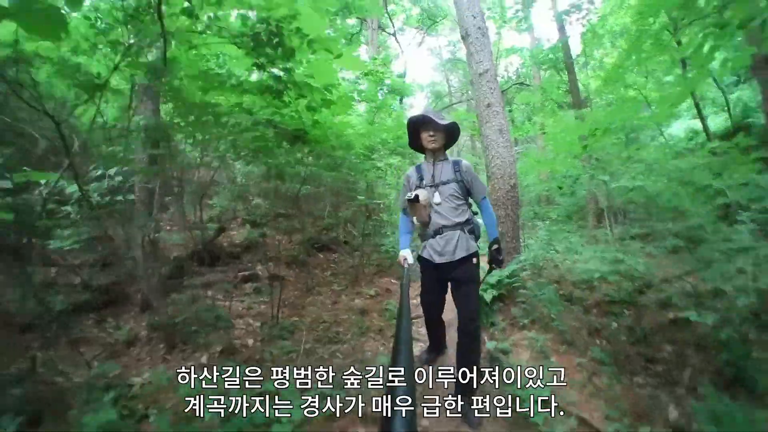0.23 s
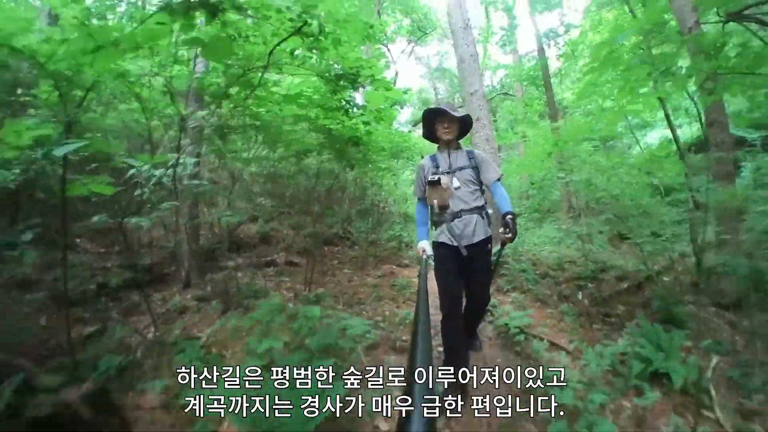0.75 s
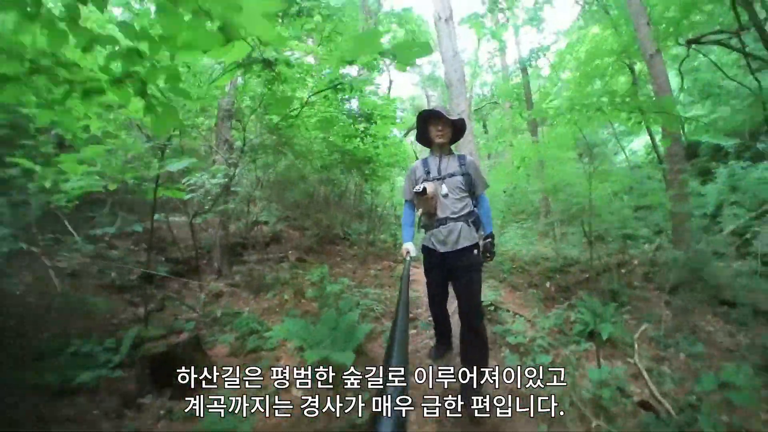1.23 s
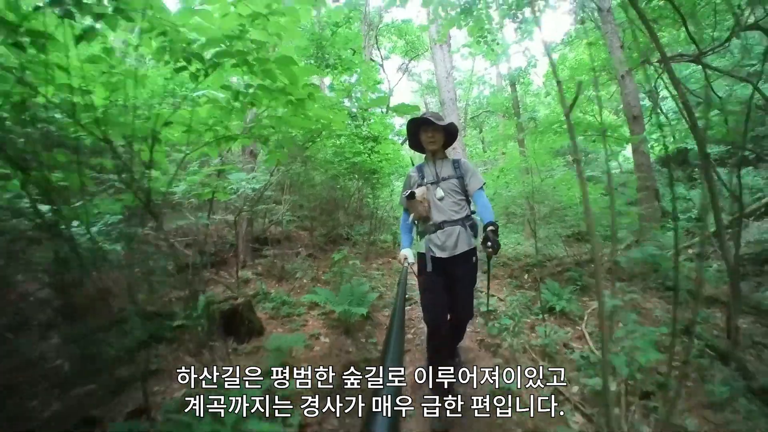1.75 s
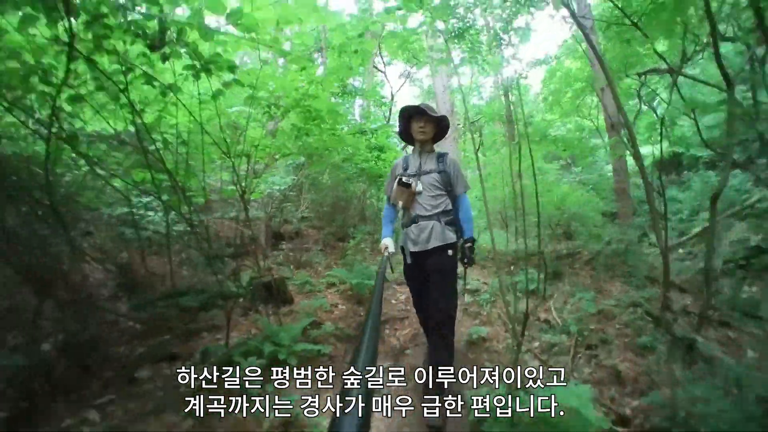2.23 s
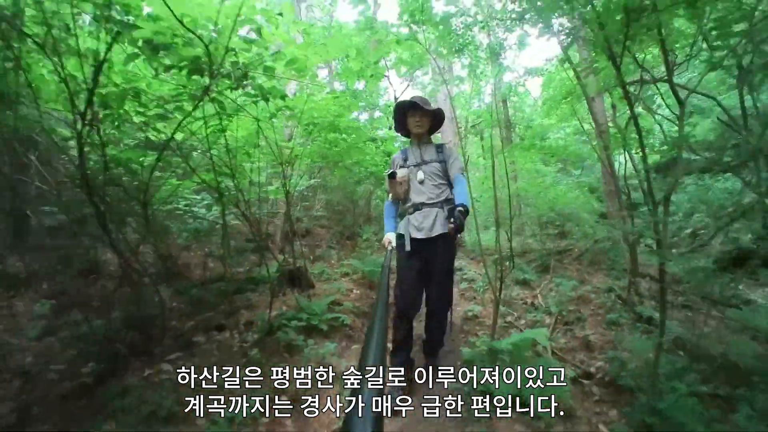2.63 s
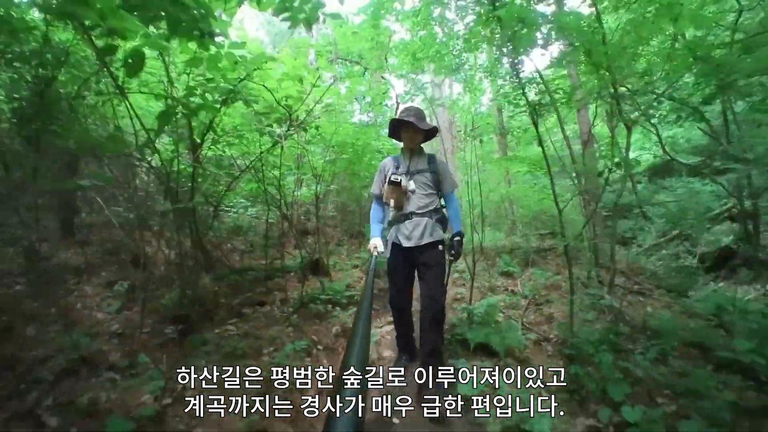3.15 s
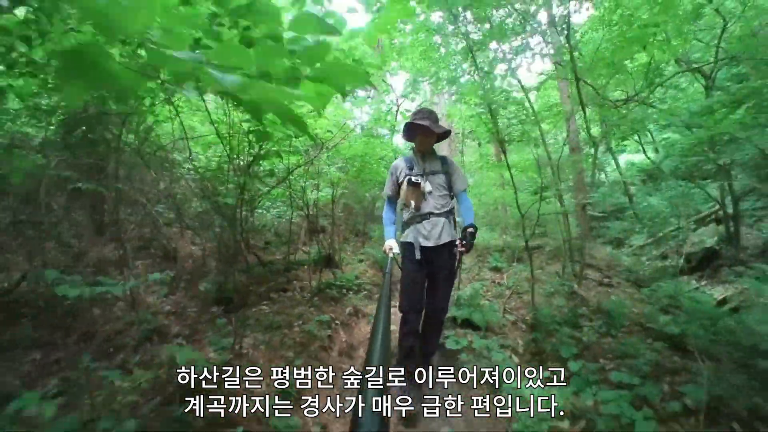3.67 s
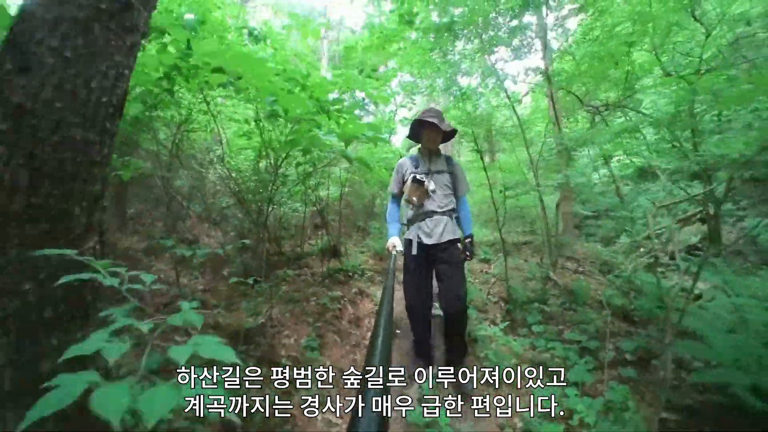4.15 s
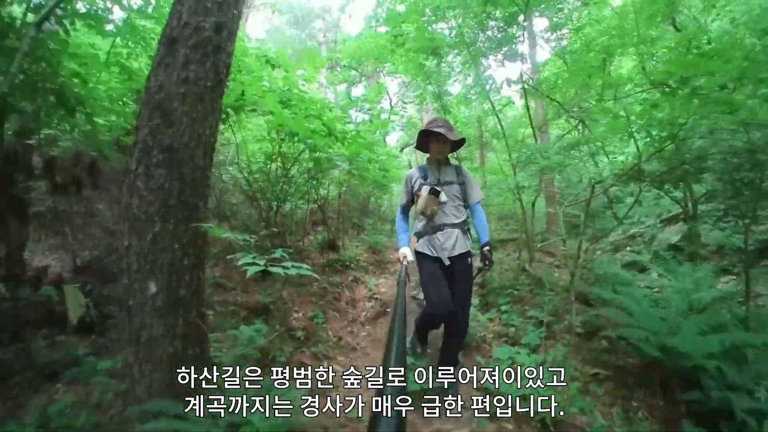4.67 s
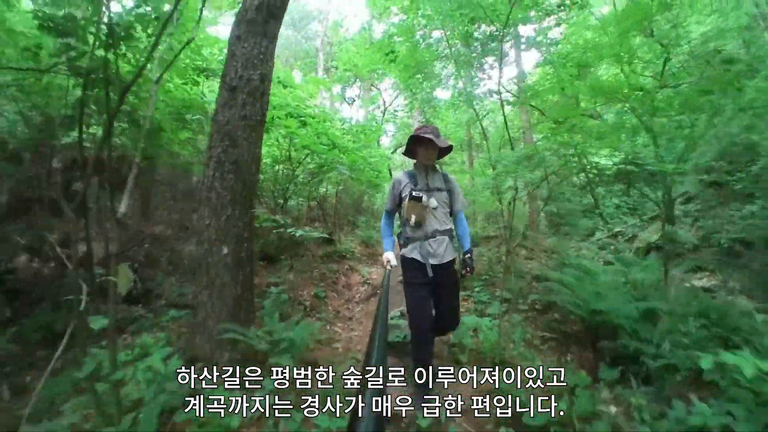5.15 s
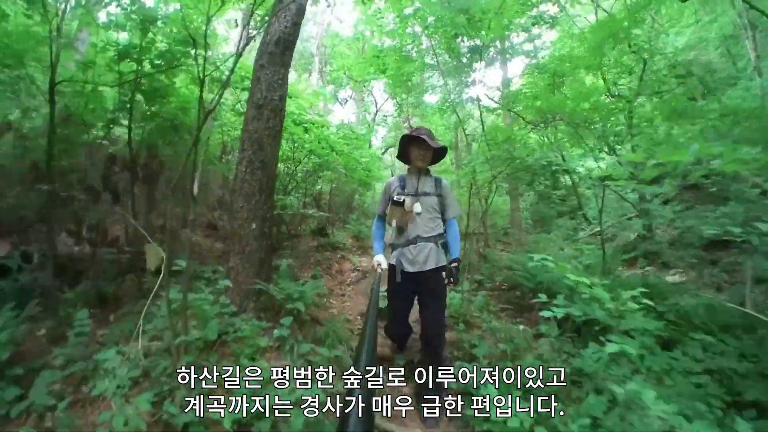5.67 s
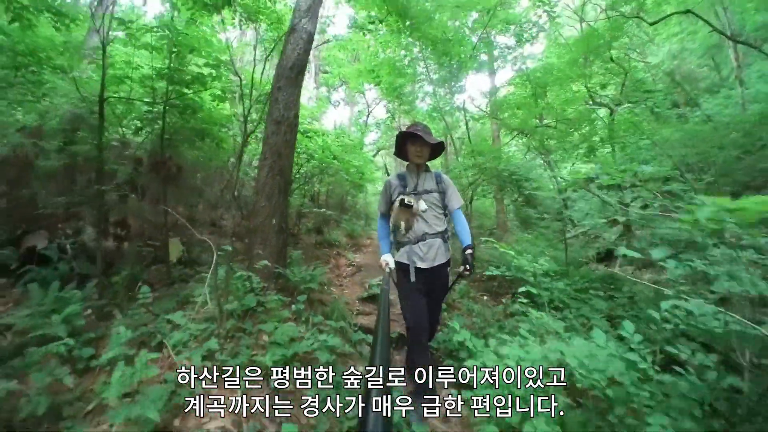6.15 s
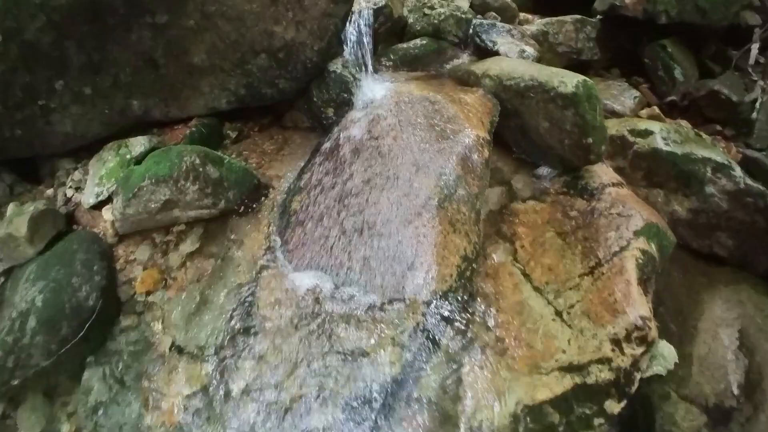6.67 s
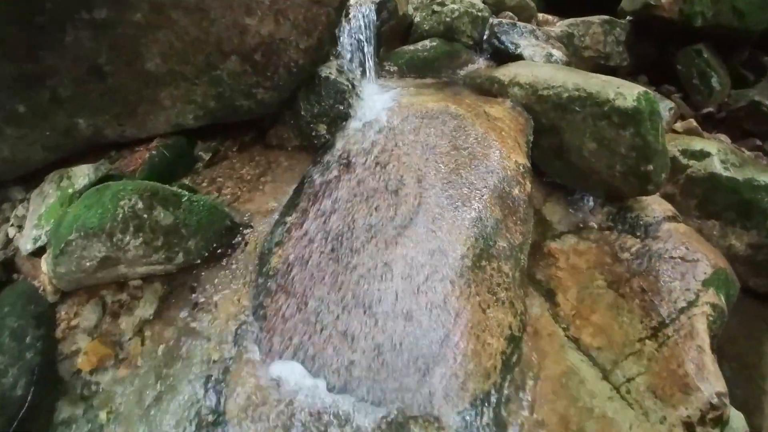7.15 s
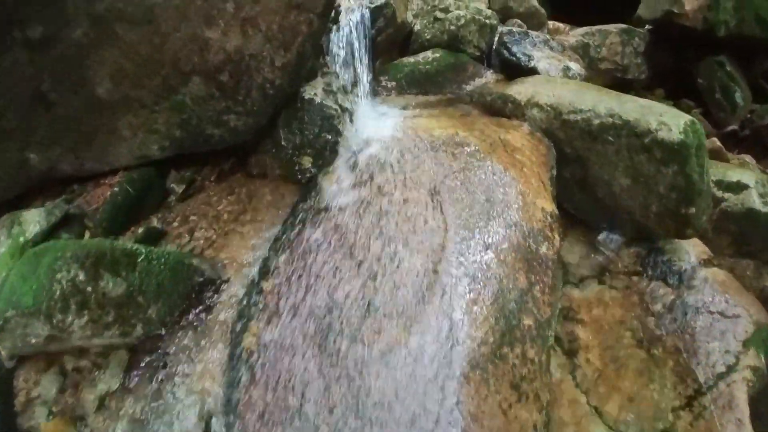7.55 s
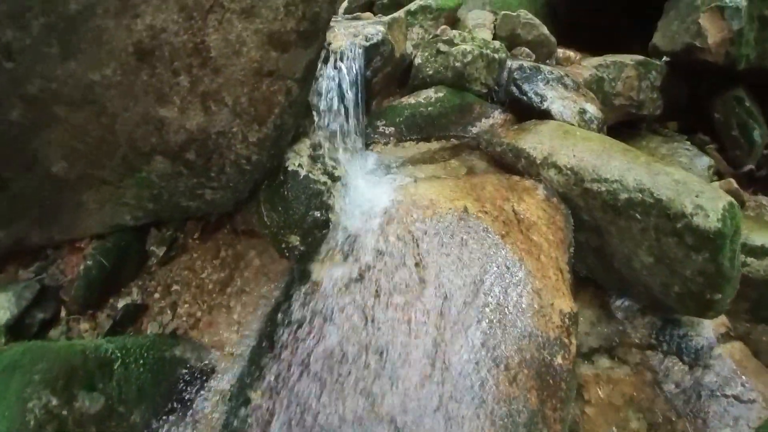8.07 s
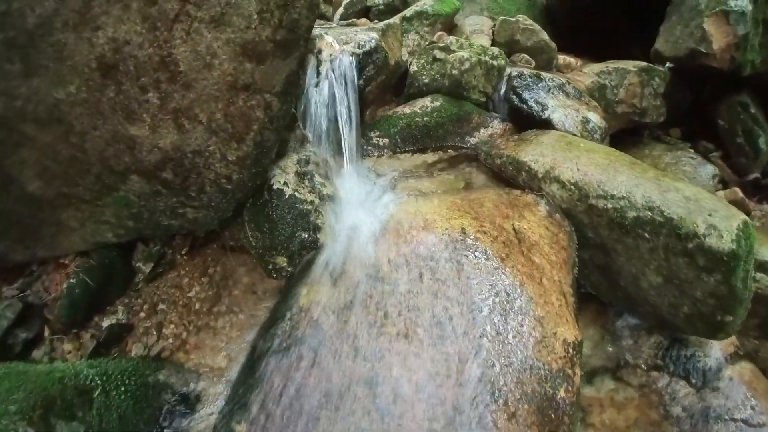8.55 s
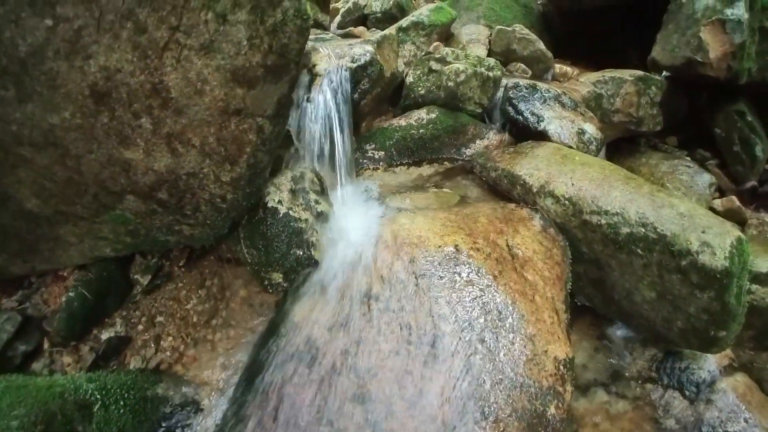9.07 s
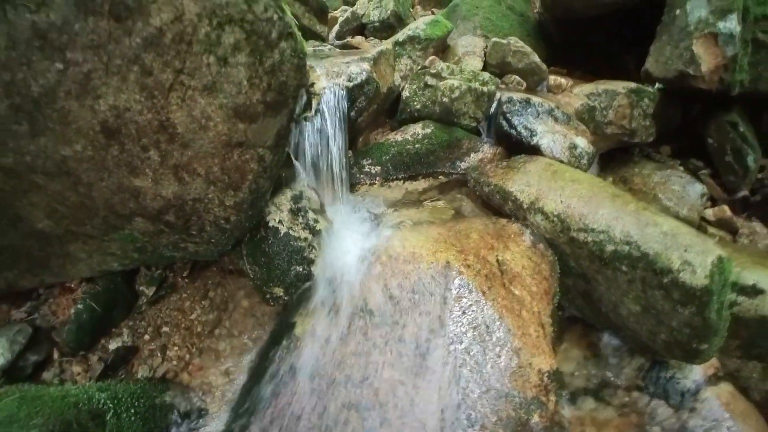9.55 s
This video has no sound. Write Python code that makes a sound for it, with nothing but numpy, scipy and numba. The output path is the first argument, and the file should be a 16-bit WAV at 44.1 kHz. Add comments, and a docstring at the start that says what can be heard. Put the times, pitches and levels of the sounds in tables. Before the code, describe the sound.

Irregular knocks and dull thumps from a hand-held pole dominate the first part, close and dry, with boots scraping leaf litter and twigs cracking. Far birds chirp, buzz and whistle around in the trees over very soft air. The walking then stops abruptly, replaced by a near trickling cascade: dense watery burble, crisp splatter on stone and occasional deeper gulps, continuing to the end as a rasping bird trills behind.

```python
"""A forest path: a hiker walks with a camera on a pole, then a small waterfall pours onto a rock slab close by.
Far off, songbirds (gliding, buzzing tones) and two early hoarse calls (pulsed resonances) echo in the trees.
Close to the microphone the pole knocks and thumps (damped pings); boots scuff dry leaves and snap twigs (shaped
grit and short rings), and clothes rub (fitful noise). The scene then changes all at once to the waterfall:
swarms of ringing bubbles, gulps, spray and single drops over coloured noise."""
import sys
import numpy as np
from scipy import signal
from scipy.fft import rfft, irfft
from scipy.io import wavfile
from scipy.ndimage import uniform_filter1d
from numba import njit

SR = 44100
rng = np.random.default_rng(int(sys.argv[2]) if len(sys.argv) > 2 else 0)


def dump_mix(stems):
    """Bounce the given channels to the path in sys.argv[1] as a 16-bit WAV at rate SR."""
    frames = np.atleast_2d(stems).T  # one column per channel
    limited = np.clip(frames, -1, 1)  # hard clip at full scale
    pcm = np.round(limited * 32767).astype(np.int16)
    wavfile.write(sys.argv[1], SR, pcm)


N = 432621
TIME = np.arange(N) / SR

# Air in the canopy, all around. Each row: frequency in Hz, level in dB.
CANOPY_COLOUR = [(30, -24.5), (55, -5.5), (90, -2.5), (200, 2.5), (400, 0), (800, 0.5), (1700, -5.5),
                 (4000, -8.5), (7500, -11.5), (15500, -11.5)]
# Width of that air. Each row: frequency in Hz, side level relative to mid in dB.
CANOPY_WIDTH = [(40, -12.5), (200, -3.5), (1000, -8.5), (4000, -6), (8000, -14.5), (15000, -6)]
CANOPY_DB = -63.5
# What the trunks throw back; long waves bend round them. Each row: frequency in Hz, level in dB.
TRUNK_SCATTER = [(40, -28), (200, -0.5), (600, -2.5)]

# Hoarse calls far off. Each row: start in seconds, length in seconds, level in dB before the echo.
FAR_CALLS = [(0.5, .68, -63), (1.78, .66, -63.5)]
# Throat resonances. Each row: frequency in Hz with the mouth wide open, level in dB.
THROAT_MODES = [(1566.5, 0.5), (1234, -6.5)]

# Pure whistles among the trees. Each row: start in seconds, number of notes, note length in seconds,
# starting pitch in Hz, held pitch in Hz, level in dB before the echo.
BIRD_WHISTLES = [(0.576, 1, 0.171, 4459, 4315, -59), (2.494, 1, 0.263, 4313, 4359, -62),
                 (3.459, 1, 0.118, 6240, 5624, -69), (3.468, 1, 0.225, 3324, 4150, -68),
                 (5.284, 1, 0.167, 4970, 4923, -66.5), (5.744, 1, 0.1556, 6642, 6502, -59.5),
                 (5.937, 3, .17, 8036, 7755, -70.5), (6.455, 1, 0.216, 3726, 3634, -63.5),
                 (6.576, 1, 0.13, 5613, 5367, -57.5)]
WHISTLE_GAP_S, WHISTLE_SETTLE = 0.05, 0.45  # rest between notes; glide time as a share of a note
# Slurs that swoop down to a held note. Each row: start in seconds, number of notes,
# seconds from note to note, held pitch in Hz, level in dB before the echo.
BIRD_SLURS = [(-.07, 4, .165, 5234, -66), (1.91, 3, 0.166, 4626, -64), (8.6, 5, 0.16, 5480, -61.5)]
SLUR_DROP, SLUR_FILL = 0.44, 0.852  # greatest rise above the held pitch; share of the step that sounds
# Rasping trills. Each row: start in seconds, number of notes, seconds from note to note,
# top pitch in Hz, bottom pitch in Hz, level in dB before the echo.
BIRD_RASPS = [(.775, 2, 0.187, 6058, 4095, -62), (1.475, 3, 0.1005, 5512, 3771, -61.5),
              (2.7, 7, 0.0713, 4505, 3784, -66.5), (3.34, 1, .1, 5010, 3228, -65.5),
              (4.17, 1, .1, 5620, 4047, -66), (5.425, 2, 0.174, 5220, 3787, -56.5),
              (5.907, 3, 0.19, 5130, 4204, -69), (6.963, 3, 0.081, 5460, 3358, -60),
              (7.564, 10, 0.0733, 5430, 4004, -52.5)]
RASP_S = 0.0802  # length of a rasped note
SLUR_BUZZ, RASP_BUZZ = 1, 0.8  # share of the glide that the buzz shakes
PHRASE_EDGE_DB = -0.5  # a trill swells from about this level and fades back to it

# Boots in leaves and grit, below the microphone. Each row: start in seconds, scrape level in dB,
# decay in seconds, crackle level relative to the scrape in dB.
BOOT_SCUFFS = [(.194, -60, 0.0293, -7), (.434, -49.5, 0.0121, -9), (.609, -46, 0.045, -28.5),
               (0.919, -47, 0.0083, -13.5), (1.284, -48.5, 0.0128, -8.5), (1.432, -51.5, 0.0166, -0.5),
               (1.76, -57.5, 0.033, -8.5), (2.543, -54.5, 0.0226, 2), (2.665, -54, 0.029, -5.5),
               (2.793, -53, 0.0114, -2), (3.025, -61, 0.0092, 4), (3.468, -57.5, 0.023, -17.5),
               (4.351, -46.5, 0.0077, -26.5), (5.625, -62.5, 0.055, -15.5), (6.019, -56.5, 0.0177, -2)]
# Dull scrape of the sole. Each row: frequency in Hz, level in dB.
SCRAPE_COLOUR = [(100, -22), (400, -8.5), (800, 6), (1200, -3), (2200, -10.5), (3200, -28.5), (6000, -46),
                 (15000, -79)]
# Bright crackle of leaves. Each row: frequency in Hz, level in dB.
LEAF_COLOUR = [(800, -14), (2700, 8), (5000, -4.5), (7000, -2), (9000, -2), (15000, -9)]
# Twigs underfoot. Each row: start in seconds, level in dB.
TWIG_SNAPS = [(1.447, -45), (2.545, -49.5), (2.561, -43), (2.674, -41), (2.681, -42.5), (2.737, -45.5)]
# Wooden rings of a broken twig. Each row: frequency in Hz, level in dB.
TWIG_RINGS = [(850, -3), (1500, -5.5), (2130, -7.5), (2850, -9)]
SNAP_S = 0.000883  # a snap peaks after this time and dies about as fast

# Clacking pole joints, close to the microphone. Each row: start in seconds, peak level in dB, ring in Hz.
JOINT_CLACKS = [(.611, -31, 704), (.628, -36, 758), (.776, -44.5, 503), (1.113, -36, 748),
                (1.127, -40, 767), (1.159, -49, 940), (1.166, -38, 740), (1.288, -37.5, 553),
                (1.75, -43.5, 683), (1.76, -43, 554), (2.738, -41, 577), (3.82, -42.5, 513),
                (4.023, -39.5, 400), (4.353, -37, 438), (4.509, -42, 376), (5.015, -48.5, 316),
                (5.033, -46, 323), (5.61, -47.5, 596), (6.122, -41.5, 418)]
CLACK_CYCLES, CLACK_HZ = 0.743, 600  # cycles to the peak at this pitch; more for higher, in proportion
# Footfalls jolting the camera through the pole. Each row: start in seconds, peak level in dB,
# starting pitch in Hz.
FOOT_THUMPS = [(0.425, -48.5, 304), (.614, -30.5, 382), (.735, -43, 330), (.842, -41, 400),
               (.917, -42, 330), (.922, -34, 137.5), (0.934, -41, 330), (0.967, -50, 450),
               (2.337, -36, 204.6), (2.828, -43, 160), (3.312, -43.5, 176), (3.81, -47, 280),
               (3.936, -41, 65), (3.965, -39.5, 120), (4.006, -30.5, 160), (4.02, -37, 100),
               (4.059, -49.5, 220), (4.316, -50, 170.4), (4.515, -29.5, 230), (4.566, -29.5, 184),
               (4.582, -47.5, 450), (4.622, -48, 260), (4.66, -47, 200), (4.679, -43, 328),
               (6.122, -54.5, 150), (6.703, -50, 120)]
THUMP_CYCLES, THUMP_GLIDE = 0.425, -0.311  # a dull push that hardly rings and slows as the pole springs back
# The grip creaks as it takes the load before a blow, and as it eases afterwards.
FLEX_S, CREAK_S, CREAK_DB = 0.0057, 0.0132, -14.5
SWAY_S, SWAY_DB = 0.009, -26  # the pole shudders for a moment on either side of a footfall
# Shudder of the pole. Each row: frequency in Hz, level in dB.
SHUDDER_COLOUR = [(25, -4.5), (70, 0), (250, 11.5), (500, -18.5), (1200, -50), (4000, -60)]

FALL_START_S = 6.662
# The waterfall, close by. Each row: time in seconds, pool level in dB, spray level in dB.
FALL_FLOW = [(6.7, -44, -53.5), (7.4, -45, -53.5), (8.1, -44, -51.5), (8.7, -43, -51), (9.201, -43, -50.5),
             (9.6, -45.5, -51)]
# Pool of the waterfall. Each row: frequency in Hz, level in dB.
POOL_COLOUR = [(40, -45.5), (90, -15), (200, -15), (255, -3), (385, -0.5), (480, -7.5), (580, -4),
               (920, -5), (1300, -10), (1830, -14), (2820, -9), (3600, -23.5)]
# Spray on the slab. Each row: frequency in Hz, level in dB.
FIZZ_COLOUR = [(2600, -9), (3300, 2), (4200, 2), (5200, -0.5), (6200, -0.5), (7200, -3.5), (8400, -1),
               (9800, -7.5), (11200, -5.5), (13500, -10.5), (15500, -13)]
# The largest air pockets. Each row: start in seconds, peak level in dB, starting ring in Hz.
AIR_GULPS = [(6.701, -38, 430), (6.704, -32.5, 773), (6.914, -38.5, 2750), (7.066, -38.5, 553),
             (7.834, -36.5, 437), (8.419, -36.5, 289), (8.628, -33.5, 887), (8.714, -37.5, 303),
             (8.97, -34, 362.6), (8.98, -34, 754), (8.982, -29.5, 1093), (9.025, -33, 2275),
             (9.058, -38, 627), (9.09, -37.5, 356.3), (9.216, -37, 922), (9.226, -34, 283.6),
             (9.35, -39, 288.4), (9.772, -37, 313)]
# Cycles to the peak at this pitch; smaller pockets ring for more cycles, by this power.
GULP_CYCLES, GULP_HZ, GULP_LAW = 1.32, 400, 0.19
GULP_GLIDE = 0.0309  # a pocket rings higher as it nears the surface
# The loudest drops that smack on the rock. Each row: start in seconds, level in dB, ring in Hz.
ROCK_DROPS = [(6.702, -33.5, 4500), (6.708, -30.5, 3200), (7.135, -37, 14000), (7.165, -37, 5800),
              (7.235, -36, 14000), (7.339, -39, 6200), (7.447, -38.5, 11000), (8.068, -31, 7880),
              (8.398, -40, 11060), (9.072, -35.5, 10500)]
STRAY_DROP_DB, STRAY_GULP_DB = -64.5, -61.5

TOP_HZ = 15700  # upper limit of the camera


def undb(db):
    """Decibels to gain."""
    return 10 ** (np.asarray(db) / 20)


def unit(x):
    """Scale to rms 1."""
    return x / np.sqrt(np.mean(x ** 2))


def colour(x, points):
    """Filter by a spectrum of (Hz, dB) points."""
    hz, db = np.transpose(points)
    f = np.maximum(np.fft.rfftfreq(x.shape[-1], 1 / SR), 1)
    gain = undb(np.interp(np.log(f), np.log(hz), db))
    return irfft(rfft(x) * gain, x.shape[-1])


def noise(points):
    """Coloured noise of rms 1."""
    return unit(colour(rng.standard_normal(N), points))


def walk(rate):
    """Random levels, one every 1 / rate s, slewed from each to the next; spread near 1."""
    hold = int(SR / rate)
    steps = np.repeat(rng.standard_normal(N // hold + 1), hold)
    return 1.2 * uniform_filter1d(steps, hold)[:N]


def add(out, s, x):
    """Mix x into out from time s on, cropped at both ends."""
    i = int(s * SR)
    x, i = x[max(-i, 0):max(N - i, 0)], max(i, 0)
    out[i:i + len(x)] += x


def ping(hz, cycles, glide=0):
    """A damped resonance that swells for some cycles and dies as its pitch glides; returns tone, envelope."""
    age = np.arange(int(10 * cycles / hz * SR)) * hz / SR / cycles
    envelope = age * np.exp(1 - age)
    turns = age * cycles * (1 + age) ** glide
    return envelope * np.sin(2 * np.pi * turns), envelope


@njit
def ring(start, hz, cycles, size, glide):
    """Resonances that each ring down by 52 dB over their cycles while the pitch climbs by the share glide."""
    out = np.zeros(N)
    for k in range(len(start)):
        life = cycles[k] * SR / hz[k]
        turn = 2 * np.pi * hz[k] / SR
        z = size[k] + 0j
        p = np.exp(1j * turn - 6 / life)
        bend = np.exp(1j * turn * glide / life)
        for i in range(start[k], min(start[k] + int(life), N)):
            z *= p
            p *= bend
            out[i] += z.imag
    return out


def grit(per_s, spread_db, points):
    """Many tiny slips and snaps of uneven size, coloured; rms 1."""
    clicks = (rng.random(N) < per_s / SR) * np.sign(rng.standard_normal(N))
    size = undb(spread_db * np.clip(rng.standard_normal(N), -2, 2))
    return unit(colour(clicks * size, points))


def forest():
    """A wide, quiet wash of air in the canopy: coloured noise with opposite sides left and right."""
    mid, side = noise(CANOPY_COLOUR), colour(noise(CANOPY_COLOUR), CANOPY_WIDTH)
    return undb(CANOPY_DB + 0.326 * walk(3.19)) * (mid + side * np.array([[1], [-1]]))


def trees(x, t60, direct_db):
    """Trunks and leaves scatter a sound into a decaying noise tail that differs left and right."""
    t = TIME[:SR]
    decay = undb(-60 * t / t60) + 1.35 * np.exp(-t / 0.016)  # long echo and early scatter
    tail = rng.standard_normal((2, SR)) * decay
    tail /= np.sqrt(np.sum(tail ** 2, axis=1, keepdims=True))
    return undb(direct_db) * x + signal.fftconvolve(x[None], tail, axes=1)[:, :N]


def caller(pitch_hz=250, rough=0.0862, arch=0.38, closed=0.639):
    """A far, hoarse call: uneven pulses ring the throat, whose resonances rise as the mouth opens."""
    effort, loudness = np.zeros(N), np.zeros(N)
    for s, length, db in FAR_CALLS:
        swell = np.abs(np.sin(np.linspace(0, np.pi, int(length * SR))))
        add(effort, s, np.sqrt(swell))
        add(loudness, s, undb(db) * swell ** 0.344)
    turns = np.cumsum(pitch_hz * (1 + arch * effort + rough * walk(500))) / SR
    pulses = np.flatnonzero(np.diff(np.floor(turns)))
    mouth = closed + (1 - closed) * effort[pulses]
    mouth *= 1 + 0.0395 * rng.standard_normal(N)[:len(pulses)]
    each = np.ones(len(pulses))
    voice = sum(ring(pulses, hz * mouth, 22.3 * each, undb(db) * each, 0.) for hz, db in THROAT_MODES)
    return loudness * unit(colour(voice, [(400, -30), (900, -2.5), (1850, 0.5), (2500, 1.5)]))


def note(length, from_hz, to_hz, settle_s, buzz, waver, buzz_hz=70):
    """One bird note: it glides toward its last pitch; buzz (0-1) shakes it across the rest of its glide."""
    t = TIME[:int(length * SR)]
    chance = waver[rng.integers(N - SR):][:len(t)]
    warble = np.sin(np.pi * (rng.random() + np.cumsum(buzz_hz * (1 + 0.401 * chance)) / SR)) ** 2
    reach = np.exp(-(t / settle_s) ** 2) * (1 - buzz * warble)
    hz = (to_hz + (from_hz - to_hz) * reach) * (1 + 0.00892 * chance)
    swell = np.abs(np.sin(np.pi * t / length)) ** 0.37
    return swell * np.sin(2 * np.pi * np.cumsum(hz) / SR)


def songbirds():
    """Rows of like notes from gliding tones: pure whistles, buzzed swooping slurs and rasping, falling trills."""
    out, waver = np.zeros(N), walk(250)
    for s, notes, length, start_hz, hz, db in BIRD_WHISTLES:
        for k in range(notes):
            tone = note(length, start_hz, hz, WHISTLE_SETTLE * length, buzz=0, waver=waver)
            add(out, s + k * (length + WHISTLE_GAP_S), undb(db) * tone)
    for s, notes, step, hz, db in BIRD_SLURS:
        for k in range(notes):
            tone = note(SLUR_FILL * step, hz * (1 + SLUR_DROP), hz, 0.068, SLUR_BUZZ, waver)
            add(out, s + k * step, undb(db) * tone)
    for s, notes, step, top_hz, bottom_hz, db in BIRD_RASPS:
        for k in range(notes):
            edge = 1 - np.sin(np.pi * (k + 0.5) / notes)
            tone = note(RASP_S, top_hz, bottom_hz, 0.078, RASP_BUZZ, waver)
            add(out, s + k * step, undb(db + PHRASE_EDGE_DB * edge) * tone)
    return out


def clothes(rustle_db=-76):
    """Clothes and straps rub in small, uneven fits of noise for as long as the hiker walks."""
    fits = unit(undb(2.87 * np.minimum(walk(22), 2) + 4.7 * walk(150)))
    cloth = noise([(50, -20.5), (180, -2.5), (450, 2.5), (1000, -2), (2500, -23.0), (12000, -22.5)])
    return undb(rustle_db) * fits * cloth * (TIME < FALL_START_S)


def boots():
    """A sole grinds into the litter: a dull scrape and a grainy crackle of leaves."""
    scrape, crackle, t = np.zeros(N), np.zeros(N), TIME[:SR // 4]
    for s, db, decay, crackle_db in BOOT_SCUFFS:
        press = (1 - np.exp(-t / 0.000346)) * np.exp(-t / decay)
        add(scrape, s, undb(db) * press)
        add(crackle, s, undb(db + crackle_db) * press)
    ground = scrape * grit(per_s=800, spread_db=2, points=SCRAPE_COLOUR)
    return ground + crackle * grit(per_s=1900, spread_db=3, points=LEAF_COLOUR)


def twigs():
    """Dry twigs break under the sole: a crack and a very short wooden ring."""
    out = np.zeros(N)
    for s, db in TWIG_SNAPS:
        for hz, mode_db in TWIG_RINGS:
            tone, envelope = ping(hz, SNAP_S * hz)
            crack = 0.15 * envelope * rng.standard_normal(len(tone))
            add(out, s, undb(db + mode_db) * (tone + crack))
    return out


def pole():
    """Joints clack, footfalls thump and set the pole shuddering; the grip rasps with each blow and creaks."""
    joints, thumps, grip, sway = np.zeros((4, N))
    t = TIME[:SR] - 0.5  # time around a blow
    for s, db, hz in JOINT_CLACKS:
        tone, envelope = ping(hz, CLACK_CYCLES * hz / CLACK_HZ)
        add(joints, s, undb(db) * tone)
        add(grip, s, undb(db) * envelope)
    for s, db, hz in FOOT_THUMPS:
        tone, envelope = ping(hz, THUMP_CYCLES, THUMP_GLIDE)
        add(thumps, s, undb(db) * tone)
        add(grip, s, undb(db - 1.5) * envelope)
        add(sway, s + t[0], undb(db + SWAY_DB) * np.exp(-np.abs(t) / SWAY_S))
    creak = np.exp(-np.maximum(t / CREAK_S, -t / FLEX_S))
    for s, db, _ in JOINT_CLACKS + FOOT_THUMPS:
        add(grip, s + t[0], undb(db + CREAK_DB) * creak)
    rasp_colour = [(30, -29), (150, 5), (400, 5.5), (1000, -4.0), (2000, -22), (5000, -23.5), (15000, -44)]
    rasp = grit(per_s=1600, spread_db=1.5, points=rasp_colour)
    joints = colour(joints + undb(-14.5) * grip * rasp, [(30, -30), (110, -10), (260, 0)])
    return thumps + joints + sway * noise(SHUDDER_COLOUR) * undb(4.9 * walk(120))


def bubbles(per_s, low_hz, high_hz, cycles, spread_db, glide):
    """A swarm of bubbles: small ones are many, a few of any size are loud; even power per Hz."""
    when, pitch, damping, luck = rng.random((int(per_s * N / SR), 4)).T
    hz = (np.sqrt(low_hz) + pitch * (np.sqrt(high_hz) - np.sqrt(low_hz))) ** 2
    size = hz ** (3 / 4) * undb(-spread_db * np.log(luck + 0.0178))
    return ring((when * N).astype(np.int64), hz, cycles * (0.5 + damping), size, glide)


def waterfall():
    """The jet drives air into the pool, spray fizzes on the slab; a rush of small splashes lies under both."""
    s, flow_db, spray_db = np.transpose(FALL_FLOW)
    swarm = bubbles(per_s=1100, low_hz=165.0, high_hz=3670, cycles=29.27, spread_db=2.0, glide=0.1716)
    pool = unit(unit(colour(swarm, POOL_COLOUR)) + undb(-3.5) * noise(POOL_COLOUR))
    pool *= undb(np.interp(TIME, s, flow_db) - 0.2932 + 0.092 * walk(8.6))
    swarm = bubbles(per_s=4000, low_hz=2659, high_hz=16160, cycles=27.8, spread_db=4.0, glide=0.144)
    spray = unit(unit(colour(swarm, FIZZ_COLOUR)) + undb(-1.0) * noise(FIZZ_COLOUR))
    spray *= undb(np.interp(TIME, s, spray_db) + 1.34 * walk(45))
    out = pool + spray
    stray_gulps = bubbles(per_s=14.5, low_hz=255, high_hz=993, cycles=26.6, spread_db=3.5, glide=0.068)
    out += undb(STRAY_GULP_DB) * unit(colour(stray_gulps, POOL_COLOUR))
    stray_drops = bubbles(per_s=25, low_hz=2200, high_hz=13970, cycles=6.7, spread_db=2, glide=0.05)
    out += undb(STRAY_DROP_DB) * unit(stray_drops)
    for s, db, hz in AIR_GULPS:
        tone, _ = ping(hz, GULP_CYCLES * (hz / GULP_HZ) ** GULP_LAW, GULP_GLIDE)
        add(out, s, undb(db) * tone)
    for s, db, hz in ROCK_DROPS:
        tone, envelope = ping(hz, cycles=1.19)
        smack = 0.5 * envelope * rng.standard_normal(len(tone))
        add(out, s, undb(db) * (1.36 * tone + smack))
    onset = np.clip((TIME - FALL_START_S) / 0.0015, 0, 1)
    return out * onset * undb(np.interp(TIME, [6.69, 6.705], [-3.5, 0]))  # slightly softer at first


def scene():
    """Near sounds sit in the middle; the birds are spread among the trees."""
    steps = pole() + boots() + twigs() + clothes()
    echo = trees(colour(steps, TRUNK_SCATTER), t60=0.33, direct_db=3.0)
    near = steps + undb(-29.0) * echo + waterfall()
    far = trees(songbirds() + caller(), t60=0.985, direct_db=-9.5)
    return near + undb(2.5) * far + forest()


def record(dry):
    """The camera cuts the top with a steep low-pass."""
    return signal.sosfilt(signal.ellip(10, 0.2, 70, TOP_HZ, fs=SR, output="sos"), dry)


dry = scene()
out = record(dry)
dump_mix(out)
```